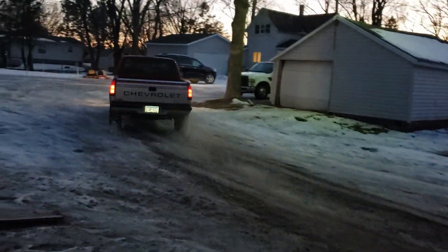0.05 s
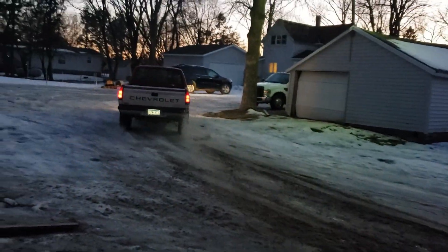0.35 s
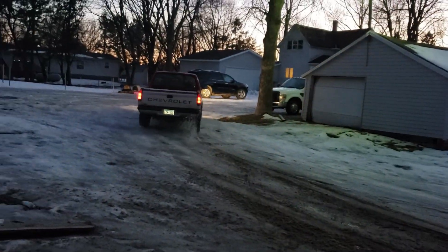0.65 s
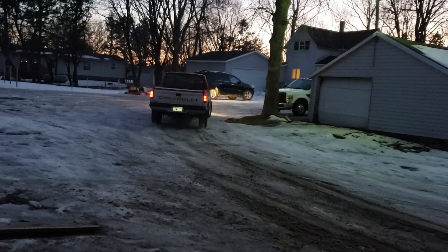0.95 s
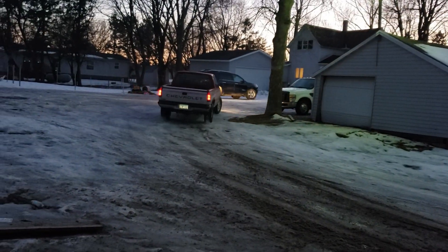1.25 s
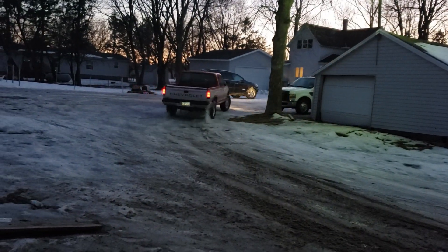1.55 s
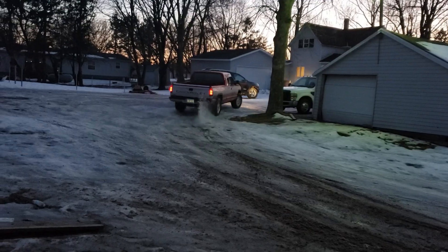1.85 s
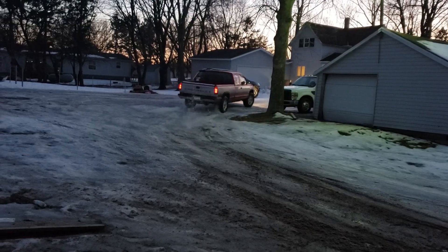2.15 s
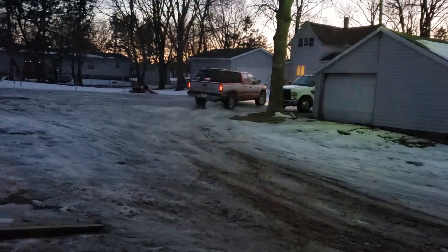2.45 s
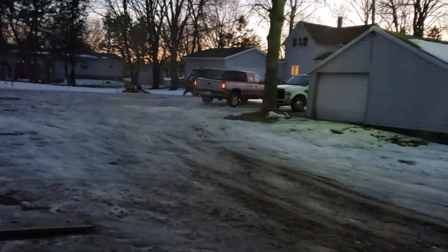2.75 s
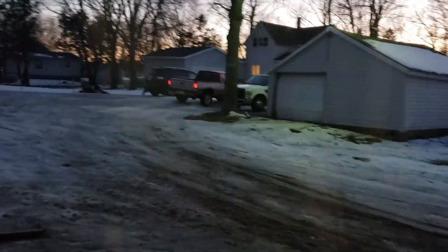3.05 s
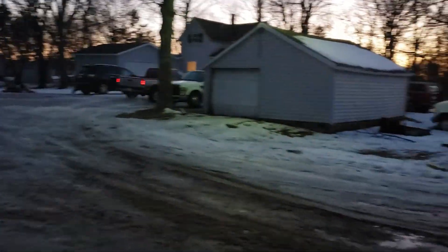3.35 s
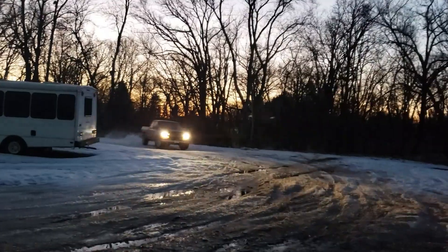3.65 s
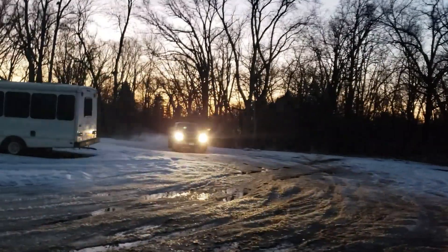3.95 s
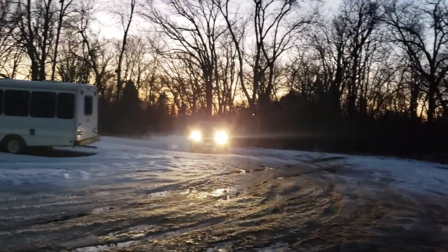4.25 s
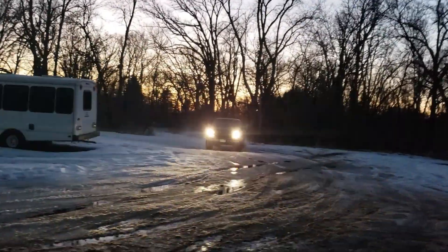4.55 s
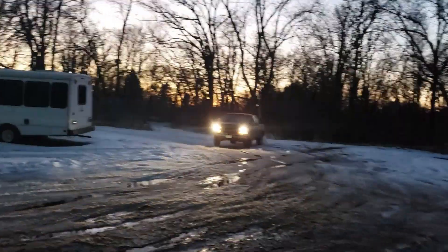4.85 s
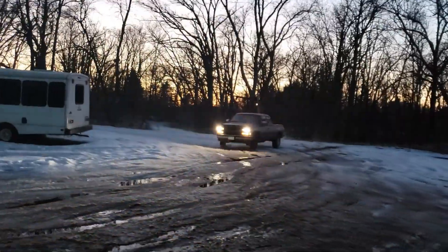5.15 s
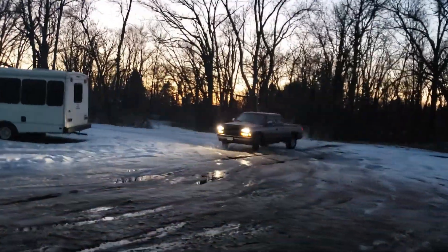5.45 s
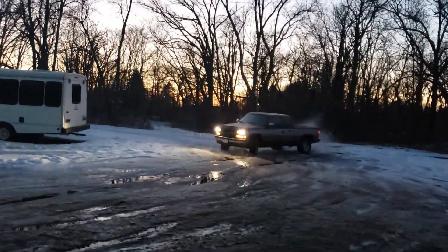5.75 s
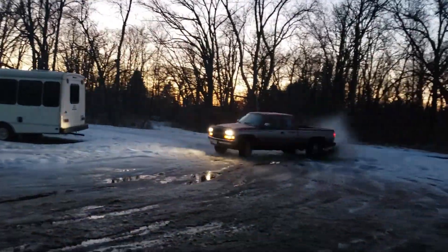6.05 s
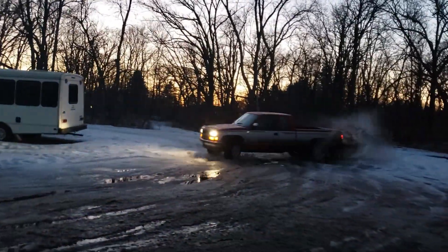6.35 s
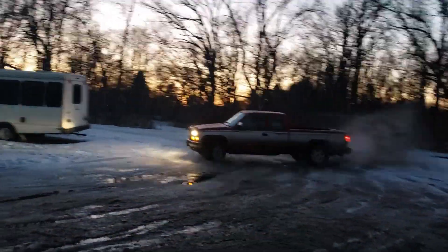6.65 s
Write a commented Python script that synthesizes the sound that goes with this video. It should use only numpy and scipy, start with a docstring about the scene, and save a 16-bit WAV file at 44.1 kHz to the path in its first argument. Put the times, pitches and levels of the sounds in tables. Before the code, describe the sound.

A pickup truck's engine drops to idle, revs three times, then builds to a close roar with tyres spinning in slush.

```python
"""A V8 pickup in a slushy lot between buildings, on a stereo pair of microphones, from two positions.
First, from behind, it rolls away and drops to a loping idle; crusted snow ticks close by.
Three stabs of throttle follow: the exhaust booms and rasps off the walls and the tyres fling slush.
From 3.56 s we stand in front. It comes on with the revs climbing, the rear wheels break loose,
and it swings side-on about ten metres from the microphones, roaring and throwing spray."""
import sys
import numpy as np
from scipy import signal
from scipy.fft import rfft, irfft, next_fast_len
from scipy.io import wavfile
from scipy.ndimage import uniform_filter1d

SR = 44100
rng = np.random.default_rng(int(sys.argv[2]) if len(sys.argv) > 2 else 0)


def unload_wav(signal):
    """Save mono or channel-first audio to the path in sys.argv[1] as 16-bit WAV at rate SR, clipped to [-1, 1]."""
    wavfile.write(
        sys.argv[1],
        SR,
        np.round(np.clip(np.atleast_2d(signal).T, -1, 1) * 32767).astype(np.int16),
    )


N = 300321
T = np.arange(N) / SR

FRONT_FROM_S = 3.562  # the listening position moves from behind the truck to in front
# Engine speed counts four-stroke cycles a second; an order is a multiple of it, 8 the firing note.
IDLE_HZ, START_HZ, TOP_HZ = 10.6, 19, 26.3
OPEN_S, SHUT_S, FLYWHEEL_S = 0.11, 0.16, 0.27  # throttle opening, shutting; lag of the speed
PULL_S, PULL_RISE_S = 0.7, 0.5  # the engine takes up the truck's weight
SPIN_S, SPIN_RISE_S = 4.84, 0.64  # the rear wheels break loose
NEAREST_S, NEAREST_M, TRUCK_M_PER_S = 6.15, 9.56, 9

# Pedal, from behind: press_s, lift_s, opening (0-1), target_hz, extra_exhaust_db, extra_bass_db
REAR_PEDAL = [(-0.2, 0.017, 0.45, 18, -0.5, 0), (1.1, 1.467, 0.43, 20.4, -2.5, 0),
              (1.4, 1.72, 0.77, 26.7, 1, -4), (1.7, 1.982, 0.42, 14.1, -1.5, 2),
              (2.055, 2.47, 0.97, 28.3, 4, -15), (2.88, 3.23, 0.99, 28.5, 0.5, 0.5),
              (3.15, 3.45, 0.81, 27.9, 1.5, -1)]
# Pedal, from the front: press_s, lift_s, opening (0-1)
FRONT_PEDAL = [(3.88, 5.1, 0.45), (4.95, 6.62, 0.79)]
# Engine speed, from the front: time_s, speed_hz
FRONT_SPEED = [(3.58, 18.1), (3.82, 18.7), (3.91, 19), (4.0, 19.2), (4.31, 19.7), (4.51, 20.7),
               (4.88, 22.2), (5.39, 24.7), (5.62, 25.3), (6.16, 26.8), (6.45, 25.4), (6.6, 25.8),
               (6.66, 25.2), (6.81, 23.7)]
# Angle to the microphones: time_s, heading (0 head-on, 1 three-quarter, 2 and over side-on)
HEADING = [(3.6, 0.13), (4.3, 0.19), (5.0, 0.8), (5.7, 0.99), (6.15, 2.66), (6.8, 2.2)]
# Exhaust note from behind: order, idle_db, loaded_db
REAR_ORDERS = [(2, -39, -46), (3, -44, -3.5), (4, -28, -15), (5, 5.5, -3.5), (6, -22, -22), (7, 3.5, -16),
               (8, -1, -14), (9, -0.5, -18.5), (10, -0.5, -15.5), (11, -11, -35), (12, -12, -54),
               (13, -7, -24.5), (14, -11, -28), (15, -15, -28), (16, -11.5, -54), (17, -27, -35),
               (18, -25.5, -29), (19, -7, -52), (20, -18, -33.5)]
# Exhaust note as the truck turns: order, head_on_db, three_quarter_db, side_on_db
FRONT_ORDERS = [(3,-41,-9.5,-25),(4,-22,-21,-38),(5,-4.5,4.5,-8.5),(6,-16.5,-19,-18),(7,-10.5,-15,-15),(9,-21,-21.5,-16.5),(10,-6.5,-15,-26),(11,-32,-15.5,-13.5),(12,-11.5,-44,-29),(13,-21.5,-14,-15.5),(14,-34,-20,-19),(15,-23,-37,-21),(16,-29.5,-31,-31),(17,-16.5,-30,-30),(18,-21.5,-32,-14),(19,-28,-18.5,-20),(20,-35,-28,-19),(21,-34,-30,-22),(22,-20,-24,-12),(23,-34,-32,-21),(24,-26,-21,-9),(25,-31,-20,-24),(26,-22,-5,-15),(27,-20,-33.5,-32),(28,-22,-32,-37),(29,-25,-19,-21),(30,-18,-24,-14.5),(32,-12.5,-38,-31),(33,-17,-24,-38)]
# Exhaust boom, from the front: time_s, level_db
FRONT_BOOM = [(3.6, -30), (4.53, -26), (4.63, -29), (4.7, -23), (4.96, -32), (5.07, -24.5), (5.58, -28),
              (5.74, -24), (5.95, -29.5), (6.08, -25), (6.76, -31), (6.81, -36)]
# Single orders that ring out as the truck turns: start_s, end_s, level_db, order
TURNING_SWELLS = [(4.7, 5.02, -30.5, 8), (4.9, 5.24, -42.5, 13), (5.2, 5.679, -33, 8),
                  (5.35, 5.95, -42.5, 19), (5.448, 6.25, -42.5, 18), (5.9, 6.169, -34, 13),
                  (6.1, 6.342, -24.5, 8), (6.28, 6.6, -35, 13), (6.415, 6.607, -29.5, 8)]
# The engine's belt drive: start_s, end_s, level_db, order
BELT_WHINE = [(5.75, 6.196, -36, 31)]
# Standing waves in the exhaust: pitch_hz, width_hz, gain_db
PIPE_RESONANCES = [(35, 35, -6), (60.4, 23, 1.5), (110.5, 28, 5), (235, 48, 6), (335, 18, 7), (370, 50, -3),
                   (428, 15, 9.5), (620, 18, 4.5), (743, 62, 6), (1027, 19, 12), (1103, 65, 8),
                   (1317, 20, 11), (1656, 77, 8.5), (1903, 12, 9.5), (2260, 42, 5), (2796, 24, 8.5),
                   (2933, 54, 6), (3380, 27, 8.5)]
# Slush off the spinning wheels, from behind: start_s, end_s, splatter_db, spray_db
FLINGS = [(1.438, 1.74, -54, -55.5), (1.751, 1.923, -57.5, -55.5), (2.09, 2.447, -51, -53),
          (2.926, 3.26, -53, -53.5), (3.199, 3.42, -54.5, -62)]
# Bursts of fine spray, from the front: start_s, end_s, level_db
SPLASHES = [(3.531, 3.592, -42.5), (3.693, 3.73, -52), (3.94, 4.004, -41.5), (4.082, 4.115, -50),
            (4.175, 4.208, -54), (4.546, 4.61, -44.5), (4.67, 4.712, -52)]
# Crusted snow close to the microphones: start_s, level_db
ICE_TICKS = [(0.9627, -47), (0.9917, -42), (1.1265, -56)]

# Noise colours of engine and exhaust: frequency_hz, relative_db
BURBLE_COLOUR = [(40, -49), (60, -17), (100, 0.5), (160, -13.5), (240, -15), (400, -25), (600, -17),
                 (1000, -62)]
RASP_COLOUR = [(260, -28), (450, -9), (616, 0), (770, -3.5), (900, -9), (1110, -8.5), (1670, -7),
               (2100, -6), (2840, -6.5), (3600, -10), (4200, -18), (5500, -21), (7500, -49)]
FAR_RASP_COLOUR = [(1200, -27), (2200, 2), (3000, 1.5), (3700, 0.5), (4300, -21), (6000, -37)]
ROAR_COLOUR = [(120, -17), (240, 0.5), (330, -11), (410, -12.5), (490, 0), (720, 3), (900, -3), (1150, -2),
               (1600, -22), (3000, -42)]
DYING_RASP_COLOUR = [(900, -25), (1600, -0.5), (3000, 1), (3900, -5), (4600, -22)]
# Noise colours of tyres, snow and the lot: frequency_hz, relative_db
RUSH_COLOUR = [(500, -6.5), (900, -7.5), (1150, -2), (1500, -2), (2000, -4), (2400, -8), (3000, -20.5),
               (4000, -32)]
SCRUB_COLOUR = [(3300, -24), (4300, -3), (5300, -5), (7000, -16)]
SPLATTER_COLOUR = [(2500, -19), (3700, -6.5), (4400, -5), (5500, -2.5), (6500, -0.5), (7600, 2.5),
                   (8600, -8), (10000, -8.5), (13000, -33)]
SPRAY_COLOUR = [(5000, -18.5), (8500, -11.5), (9860, -9.5), (11600, -2.5), (13700, -2), (14500, -3.5),
                (16600, -15.5)]
ICE_COLOUR = [(2000, -20), (5000, -8), (13000, 9), (16000, 3)]
YARD_COLOUR = [(150, -25), (250, -4.5), (320, -1), (400, -16), (520, -4.5), (660, -7), (900, -13),
               (1200, -9.5), (2200, -14), (3000, -30.5), (4000, -56), (6500, -55)]
RUMBLE_COLOUR = [(15, -21), (35, -25), (70, 23), (200, -22), (400, -31.5)]

# Gains from behind: idle_db, then what is added: pulling_db, full_throttle_db, top_speed_db
REAR_BOOM = (-51.5, 11.5, 7, 6.5)
REAR_BARK = (-59.5, 12.5, 7, 5.5)
REAR_RASP = (-67, 4.5, 23, 3)
# Gains in front, before each layer's trim: coasting_db, full_throttle_db, wheelspin_db, db_per_near_db
FRONT_BARK = (-38.5, 6, -3, -0.5)
FRONT_ROAR = (-40, 10, -2.5, 0.95)
FRONT_RASP = (-58, 11.5, -1.5, 0.06)
FRONT_RUSH = (-44.5, 6.5, 1.5, 1.06)
FRONT_SPLATTER = (-49.5, 1.5, 4.5, 0.65)
FRONT_SPRAY = (-50, -2, 7, 0.7)

# How alike the two microphones hear noise: frequency_hz, likeness (clipped to 0-1)
MIC_LIKENESS = [(25, -13), (70, 1), (120, 1.05), (240, 0.8), (480, 1), (950, 0.45), (1900, 1.04),
                (3800, -0.14), (7500, .02)]
# Balance of the pair at each position: frequency_hz, left_minus_right_db
REAR_BALANCE = [(60, 3.5), (120, 1.5), (240, 1.5), (480, 4), (950, 5), (1890, 10), (3770, -1.5), (7520, 5),
                (15000, -5.5)]
FRONT_BALANCE = [(60, 2), (99, 1.5), (160, 1), (270, 1.5), (450, 3.0), (740, 3), (1220, 8), (2010, 10.5),
                 (3330, -2), (5500, 5), (9080, 3), (15000, -4)]
# Phase across the pair: frequency_hz, left_lead_rad
MIC_LEAD = [(60, -0.14), (400, 0.44), (860, 0.11), (1600, -0.81), (2800, -1.27), (5000, 0.11)]


def truck_from_behind(speed_hz, turns):
    """Pulling away from the microphones: boom, pipe rasp and slush rise with each stab of throttle."""
    throttle = pedal(REAR_PEDAL)
    revs = (speed_hz - IDLE_HZ) / (TOP_HZ - IDLE_HZ)
    controls = ramp(PULL_S, PULL_RISE_S), throttle, revs
    exhaust = rear_exhaust(speed_hz, turns, throttle, controls)
    return exhaust + rear_rasp(turns, controls) + rear_slush()


def truck_from_front(turns):
    """Coming up to the microphones and turning: drone, belt whine, roar and spinning tyres."""
    distance_m = np.hypot(NEAREST_M, TRUCK_M_PER_S * (T - NEAREST_S))
    near_db = 20 * np.log10(NEAREST_M / distance_m)
    controls = pedal(FRONT_PEDAL), ramp(SPIN_S, SPIN_RISE_S), near_db
    heading = over_time(HEADING)
    return (front_exhaust(turns, heading, controls)
            + ringing_orders(turns, TURNING_SWELLS, shake=0.054)
            + ringing_orders(turns, BELT_WHINE, shake=0.14)
            + engine_roar(turns, near_db, controls)
            + tyre_rush(turns, controls)
            + front_rasp(turns, controls)
            + tyre_scrub(heading, controls)
            + front_slush(controls))


def crank(jitter_cycles=0.0031):
    """Engine speed and cycles turned: the flywheel lags the pedal, and uneven burning jogs the shaft."""
    push_hz = np.max([(target_hz - IDLE_HZ) * (T >= press) * (T < lift)
                      for press, lift, _, target_hz, *_ in REAR_PEDAL], 0)
    inertia = np.exp(-1 / (FLYWHEEL_S * SR))
    over_idle_hz, _ = signal.lfilter([1 - inertia], [1, -inertia], push_hz, zi=[START_HZ - IDLE_HZ])
    speed_hz = np.where(T < FRONT_FROM_S, IDLE_HZ + over_idle_hz, over_time(FRONT_SPEED))
    return speed_hz, np.cumsum(speed_hz) / SR + jitter_cycles * wander(30)


def pedal(presses):
    """Throttle opening, 0-1; where presses overlap the deepest counts."""
    return np.max([opening * held(press, lift, OPEN_S, SHUT_S)
                   for press, lift, opening, *_ in presses], 0)


def rear_exhaust(speed_hz, turns, throttle, controls):
    """Tailpipe towards us: a burbling boom and bark, the note thrown back by garage and house walls."""
    load = np.clip((speed_hz - 13) / 8, 0, 1)
    note = exhaust_note(turns, REAR_ORDERS, load, rough=0.17, rough_rise=0.017, flutter_hz=21.945)
    # with the throttle shut at high revs the charge burns raggedly
    ragged = 0.25 + 1.1 * load * np.clip(1 - throttle / 0.7, 0, 1)
    burble = ragged * noise(BURBLE_COLOUR, patchy_db=1) * puffs(turns, depth=0.62, sharpness=2.5)
    piped = pipe(echoes(steadied(note), t60_s=1, wet_db=-6.5) + burble)
    low, bark = split(piped, edge_hz=140)
    bass, boom = split(low, edge_hz=69)
    extra_db, bass_db = sum(np.outer(extras_db, held(press, lift, OPEN_S, SHUT_S))
                            for press, lift, _, _, *extras_db in REAR_PEDAL)
    boom = gain(REAR_BOOM, controls) * steadied(boom + amp(bass_db) * bass)
    bark = gain(REAR_BARK, controls) * steadied(bark)
    return amp(extra_db) * (boom + bark)


def front_exhaust(turns, heading, controls):
    """The exhaust from the front: boom, bark and snarl, changing colour as the truck turns."""
    note = exhaust_note(turns, FRONT_ORDERS, heading, rough=0.17, rough_rise=0.0023, flutter_hz=20)
    boom, upper = split(echoes(note, t60_s=0.66, wet_db=-7.5), edge_hz=158)
    bark, snarl = split(upper, edge_hz=390)
    return (amp(over_time(FRONT_BOOM)) * steadied(boom)
            + gain(FRONT_BARK, controls) * steadied(bark)
            + amp(-4) * gain(FRONT_ROAR, controls) * steadied(snarl))


def exhaust_note(turns, orders, blend, rough, rough_rise, flutter_hz):
    """Multiples of the engine cycle, blended between level columns; the high ones shake most."""
    note = np.zeros(N)
    for order, *levels_db in orders:
        angle = 2 * np.pi * (order * turns + rng.random())
        shake = rough + rough_rise * order
        partial = (1 + shake * wander(flutter_hz)) * np.cos(angle)
        partial += shake * wander(flutter_hz) * np.sin(angle)
        strength = np.interp(blend, np.arange(len(levels_db)), amp(levels_db))
        note += strength * partial / np.sqrt(1 + 2 * shake ** 2)
    return note


def puffs(turns, depth, sharpness):
    """Gas leaves in bursts: the nearer bank fires on four unevenly spaced beats of the eight."""
    beats = 8 * turns
    near_bank = np.array([1, 0, 1, 1, 0, 1, 0, 0])[beats.astype(int) % 8]
    burst = (0.5 + near_bank) * np.exp(-sharpness * (beats % 1))
    return unit(1 + depth * burst / burst.mean())


def pipe(x):
    """The exhaust system's resonances colour whatever passes through."""
    return shaped(x, lambda hz: amp(sum(db / (1 + (2 * (hz - pitch_hz) / width_hz) ** 2)
                                        for pitch_hz, width_hz, db in PIPE_RESONANCES)))


def rear_rasp(turns, controls):
    """Puffs of gas rasp through the pipe, straight at the microphones."""
    gas = noise(RASP_COLOUR, patchy_db=2) * puffs(turns, depth=0.18, sharpness=1.554)
    return gain(REAR_RASP, controls) * unit(pipe(gas))


def front_rasp(turns, controls):
    """Thin rasp from the far end of the truck, and pipe rasp dying away after the last stab."""
    far = gain(FRONT_RASP, controls) * noise(FAR_RASP_COLOUR, patchy_db=1)
    dying = amp(4.8) * slide_tail() * unit(pipe(noise(DYING_RASP_COLOUR, patchy_db=0.5)))
    return (far + dying) * puffs(turns, depth=0.24, sharpness=1.7)


def engine_roar(turns, near_db, controls):
    """Noise that pulses with the firing and throbs once a cycle; its top opens as the truck nears."""
    throb = 1 + 0.24 * np.cos(2 * np.pi * turns)
    roar = noise(ROAR_COLOUR, patchy_db=1.8) * puffs(turns, depth=0.7, sharpness=0.96)
    growl, top = split(amp(-2) * gain(FRONT_ROAR, controls) * throb * roar, edge_hz=1000)
    return amp(1.46) * growl + amp(2.5 + 1.3 * near_db) * top


def ringing_orders(turns, swells, shake):
    """Single tones that follow the engine speed, swelling and fading."""
    tones = sum(amp(db) * held(start, end, attack_s=0.11, release_s=0.14)
                * np.cos(2 * np.pi * order * turns) for start, end, db, order in swells)
    return np.sqrt(2) * (1 + shake * wander(25)) * tones


def tyre_rush(turns, controls):
    """Tyre hiss, pulsing faintly with the engine: one slide dies away, then the approach builds."""
    strength = np.hypot(amp(1.5) * gain(FRONT_RUSH, controls), amp(3.5) * slide_tail())
    return strength * noise(RUSH_COLOUR, patchy_db=1.7) * puffs(turns, depth=0.098, sharpness=0.93)


def tyre_scrub(heading, controls):
    """The wheels dig into the wet track as the truck swings round."""
    swing = np.clip(heading - 0.8, 0, 1)
    return amp(-8) * gain(FRONT_RUSH, controls) * swing * noise(SCRUB_COLOUR, patchy_db=3)


def slide_tail():
    """Gain dying away after the slide on the last stab of throttle."""
    return settling(-44.5, hold_s=3.35, fall_db_per_s=23.4)


def rear_slush():
    """From behind: airborne slush patters down, the tyres roll on, and each stab flings more."""
    flung_coarse = np.max([amp(db) * held(start, end, attack_s=0.12, release_s=0.12)
                           for start, end, db, _ in FLINGS], 0)
    flung_fine = np.max([amp(db) * held(start, end, attack_s=0.12, release_s=0.22)
                         for start, end, _, db in FLINGS], 0)
    falling_coarse = settling(-66, hold_s=0.45, fall_db_per_s=24)
    falling_fine = settling(-50.5, hold_s=0.5, fall_db_per_s=29)
    rolling_coarse, rolling_fine = amp(-67.5), amp(-65)
    coarse = np.sqrt(flung_coarse ** 2 + falling_coarse ** 2 + rolling_coarse ** 2)
    fine = np.sqrt(flung_fine ** 2 + falling_fine ** 2 + rolling_fine ** 2)
    return slush(coarse, fine, drops_db=-4)


def front_slush(controls):
    """From the front: short splashes, then a stream thrown by the spinning wheels."""
    splashes = sum(amp(db) * held(start, end, attack_s=0.031, release_s=0.051)
                   for start, end, db in SPLASHES)
    coarse = np.hypot(gain(FRONT_SPLATTER, controls), amp(-16) * splashes)
    fine = np.hypot(gain(FRONT_SPRAY, controls), splashes)
    return slush(coarse, fine, drops_db=-5.5)


def slush(coarse, fine, drops_db):
    """Wet snow flung by the tyres: a hiss with separate drops in it, arriving in clumps."""
    clumps = amp(wander(110))
    splatter = noise(SPLATTER_COLOUR, patchy_db=1.5)
    splatter += amp(drops_db - 0.5) * droplets(SPLATTER_COLOUR, per_s=2800, spread_db=3)
    spray = noise(SPRAY_COLOUR, patchy_db=1.5)
    spray += amp(drops_db) * droplets(SPRAY_COLOUR, per_s=2000, spread_db=1.5)
    return clumps * (coarse * unit(splatter) + fine * unit(spray))


def droplets(colour, per_s, spread_db):
    """Tiny impacts of unequal size, scattered between left and right."""
    sizes = amp(spread_db * np.minimum(rng.exponential(1, N), 4))
    lands = rng.random(N) < per_s / SR
    impacts = sizes * lands * rng.standard_normal((2, N))
    return unit(shaped(impacts, lambda hz: amp(over_frequency(colour, hz))))


def ice_ticks(decay_s=0.0016):
    """Short bright snaps of crusted snow close by."""
    envelope = sum(amp(db) * (T >= start) * np.exp(-abs(T - start) / decay_s) for start, db in ICE_TICKS)
    return envelope * noise(ICE_COLOUR, patchy_db=8)


def echoes(x, t60_s, wet_db):
    """Adds scattered returns from walls, parked cars and trees."""
    delay_s = np.arange(SR // 2) / SR
    taps = rng.standard_normal(len(delay_s)) * (rng.random(len(delay_s)) < 0.03)
    taps *= (delay_s > 0.025) * amp(-60 * delay_s / t60_s)
    return x + amp(wet_db) * signal.fftconvolve(x, taps / np.linalg.norm(taps))[:N]


def yard_air():
    """Faint midrange wash of the lot at the first position."""
    return amp(-57 - 4) * noise(YARD_COLOUR, patchy_db=2.2)


def outdoor_rumble():
    """Steady low rumble under both positions."""
    return amp(-60.5) * noise(RUMBLE_COLOUR, patchy_db=0)


def microphone_pair(x, balance):
    """Each frequency reaches the two microphones with its own level and delay."""
    def response(hz):
        ratio = amp(over_frequency(balance, hz))
        lead = np.exp(0.5j * over_frequency(MIC_LEAD, hz))
        return 2 * np.array([ratio * lead, 1 / lead]) / (1 + ratio)
    return shaped(x, response)


def noise(colour, patchy_db):
    """Coloured noise with drifting patches, partly alike in the two microphones."""
    frames, hz = N // 256 + 5, np.fft.rfftfreq(1024, 1 / SR)
    draws = rng.standard_normal((5, frames, len(hz)), dtype=np.float32)
    left, unrelated = draws[0] + 1j * draws[1], draws[2] + 1j * draws[3]
    patches = uniform_filter1d(uniform_filter1d(draws[4], 7, axis=0), 14, axis=1)
    likeness = np.clip(over_frequency(MIC_LIKENESS, hz), 0, 1)
    right = likeness * left + np.sqrt(1 - likeness ** 2) * unrelated
    level_db = over_frequency(colour, hz) + patchy_db * patches / patches.std()
    spectra = np.array([left, right]) * amp(level_db)
    _, sound = signal.istft(spectra.swapaxes(1, 2), nperseg=1024, noverlap=768)
    return unit(sound[:, :N])


def amp(db):
    """Decibels to amplitude."""
    return 10 ** (np.asarray(db) / 20)


def gain(levels_db, controls):
    """Amplitude from a resting level plus the decibels each control adds."""
    return amp(levels_db[0] + sum(db * control for db, control in zip(levels_db[1:], controls)))


def unit(x):
    """Scales a sound so that the mean of its channels has rms 1."""
    return x / np.sqrt(np.mean(np.atleast_2d(x).mean(0) ** 2) + 1e-20)


def steadied(x, window=5000):
    """Evens out the slow swell of a sound, leaving its throb."""
    power = uniform_filter1d(uniform_filter1d(x ** 2, window), window // 2)
    return x / np.sqrt(abs(power) + 1e-12)


def over_time(points):
    """A timed table, sample by sample."""
    return np.interp(T, *np.transpose(points))


def over_frequency(points, hz):
    """A table read on a log-frequency axis."""
    points_hz, values = np.transpose(points)
    return np.interp(np.log(hz + 1), np.log(points_hz + 1), values)


def shaped(x, response):
    """Filters x by a function of frequency."""
    size = next_fast_len(N + 4096)
    return irfft(rfft(x, size) * response(np.fft.rfftfreq(size, 1 / SR)), size)[..., :N]


def split(x, edge_hz):
    """The parts of a sound below and above a frequency."""
    low = shaped(x, lambda hz: 1 / (1 + (hz / edge_hz) ** 16))
    return low, x - low


def wander(rate_hz):
    """Random drift of about unit size."""
    return 1.2 * np.interp(T * rate_hz, np.arange(4000), rng.standard_normal(4000))


def ramp(start_s, rise_s):
    """Climbs from 0 to 1 and stays there."""
    return np.clip((T - start_s) / rise_s, 0, 1)


def held(start_s, end_s, attack_s, release_s):
    """Attack, hold and dying release."""
    return ramp(start_s, attack_s) * np.exp(-np.maximum(T - end_s, 0) / release_s)


def settling(level_db, hold_s, fall_db_per_s):
    """A gain that holds, then dies away steadily."""
    return amp(level_db - fall_db_per_s * np.maximum(T - hold_s, 0))


def scene():
    """The truck from behind, then from the front, with ice ticks and a low outdoor rumble."""
    speed_hz, turns = crank()
    behind = microphone_pair(truck_from_behind(speed_hz, turns) + yard_air(), REAR_BALANCE)
    front = microphone_pair(truck_from_front(turns), FRONT_BALANCE)
    in_front = np.clip((T - FRONT_FROM_S) / 0.012 + 0.5, 0, 1)  # 12 ms crossfade
    return (1 - in_front) * behind + in_front * front + ice_ticks() + outdoor_rumble()


def record(dry):
    """The recorder's band limit."""
    lowpass = signal.firwin(511, cutoff=16720, window=("kaiser", 9), fs=SR)
    return signal.oaconvolve(dry, lowpass[None], "same")


dry = scene()
out = record(dry)
unload_wav(out)
```